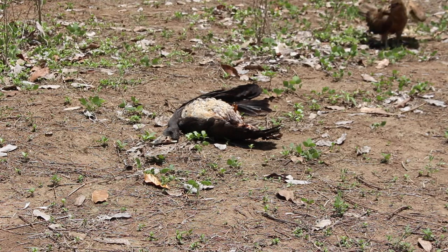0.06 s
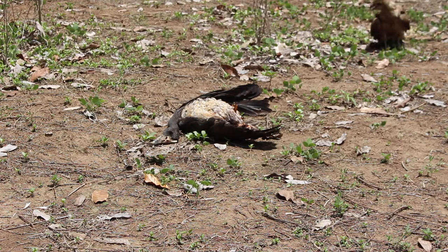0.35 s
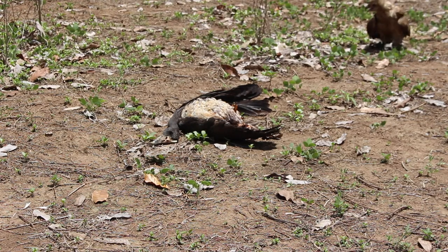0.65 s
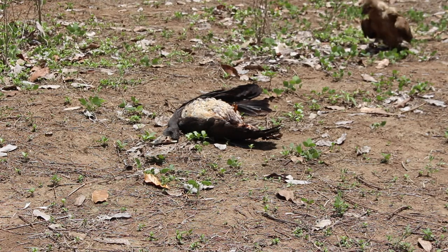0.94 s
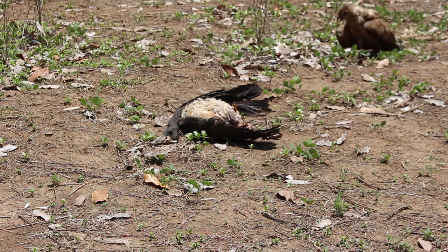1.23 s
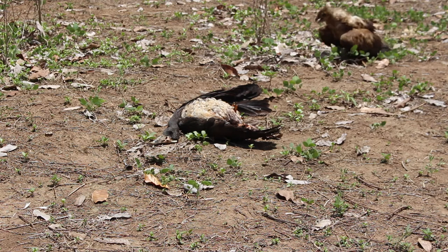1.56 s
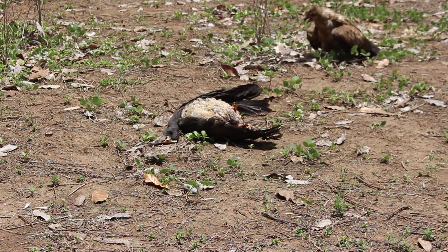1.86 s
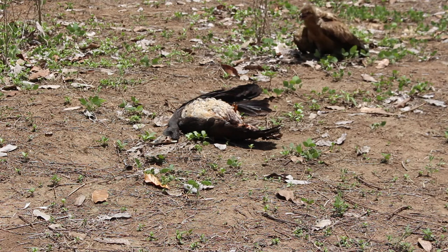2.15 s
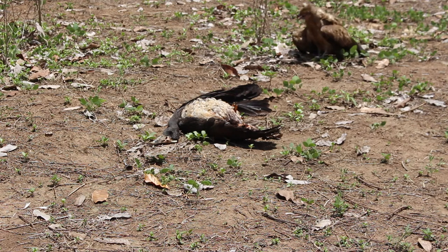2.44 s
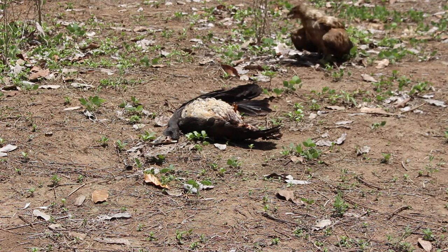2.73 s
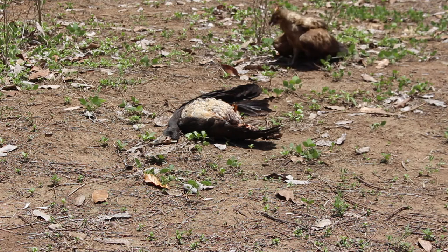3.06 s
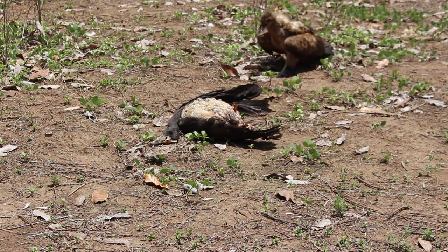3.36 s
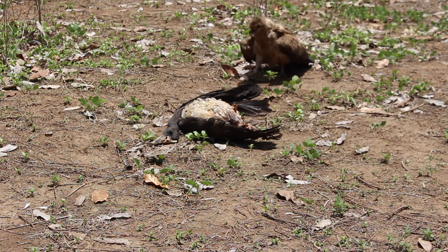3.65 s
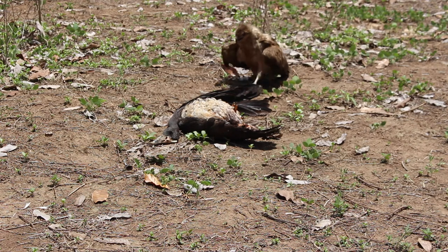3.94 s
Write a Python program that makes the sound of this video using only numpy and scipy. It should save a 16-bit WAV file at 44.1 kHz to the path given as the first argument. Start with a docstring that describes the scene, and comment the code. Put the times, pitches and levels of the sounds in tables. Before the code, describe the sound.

A bird of prey whistles rapidly and a smaller bird answers, with gusty wind.

```python
"""Whistling kite in windy bushland

A whistling kite on the left gives a run of short whistles that arch up and slide down. A smaller bird
answers with five low-high-middle phrases of pure, trilled tones. The trees echo both. Gusts of wind
buffet the microphone, cicadas click so fast that they buzz, and dry leaves tick over a steady hush."""
import sys
import numpy as np
from scipy import signal
from scipy.fft import rfft, irfft, next_fast_len
from scipy.io import wavfile
from scipy.ndimage import map_coordinates

SR = 44100
rng = np.random.default_rng(int(sys.argv[2]) if len(sys.argv) > 2 else 0)


def master_out(mix):
    """Clip the mix to full scale and print it as 16-bit PCM to the path in sys.argv[1]."""
    frames = np.transpose(np.atleast_2d(mix))
    ceiling = np.clip(frames, -1, 1)
    pcm = np.round(ceiling * 32767).astype(np.int16)
    wavfile.write(sys.argv[1], SR, pcm)


N = 176400

# The kite's whistles: (time of the top [s], pitch [Hz], level [dB], boost on the way down [dB],
# richness [dB], glide [share of pitch per s], echo boost [dB])
KITE_WHISTLES = [(0.202, 1540, -42, 5, -17, 6, 2), (0.408, 1753, -37.5, 13, 3, 5.9, 2.5),
                 (.613, 1799, -30, -5, -2, 8.8, 0), (.793, 1837, -27.5, -3, -6, 9.9, -1.5),
                 (0.956, 1868, -25.5, -1, -4.5, 8.3, -1), (1.107, 1842, -28, -3, -2.5, 10.8, -1),
                 (1.236, 1839, -29.5, -10, -3, 8.6, -2.5), (1.372, 1745, -41.5, 16, 11, 8.5, 5.5),
                 (1.497, 1770, -40, 16, 9, 9.1, 6), (1.616, 1740, -45, 16, 14, 9, 8),
                 (1.738, 1678, -45.5, 19.5, 15, 8.1, 11.5), (1.858, 1708, -47, 28, 16, 7, 13),
                 (1.992, 1719, -42, 8, 8, 6.5, 6.5), (2.122, 1799, -41.5, 11, -2, 9, 9.5)]
# Harmonics 1 to 5 of a whistle: (level [dB], share of the richness [ratio])
KITE_HARMONICS = [(-12.5, 0.34), (0, 0), (-15.5, 0.6), (-22.5, 1.05), (-35, .7)]
# The small bird's phrases: (time [s], pitch [Hz], level [dB], time stretch [ratio])
BIRD_PHRASES = [(1.552, 1529, -35, 0.91), (1.811, 1502, -34, 0.92), (2.12, 1483, -36, 0.96),
                (2.44, 1476, -38, 1.02), (2.817, 1472, -40.5, 0.98)]
# The parts of a phrase: (time into it [s], length [s], start pitch [ratio], middle pitch [ratio],
# end pitch [ratio], trill depth [share of pitch], level [dB])
PHRASE_NOTES = [(.001, 0.048, 1.08, 1.0, 1.028, .012, -0.5),
                (0.058, 0.0248, 0.9, 1.025, 1.054, 0.026, -2.5), (0.073, .042, 1.08, 1.125, 1.12, .03, -2),
                (.115, 0.039, 1.075, 1.055, 1.09, 0.017, -2)]
# Buzzes that lead into a phrase: (time [s], length [s], start pitch [Hz], end pitch [Hz], level [dB])
BIRD_BUZZES = [(1.484, 0.071, 1747, 1860, -45), (2.098, 0.039, 1815, 1746, -46)]
# Wind strength: (time [s], left level [dB], right level [dB])
WIND_STRENGTH = [(0.0, -32, -32.5), (0.03, -30, -36.5), (0.05, -40, -46.5), (0.3, -23.5, -31),
                 (0.35, -26.5, -35.5), (0.45, -21.5, -28.5), (0.55, -24.5, -29.5), (0.7, -22.5, -19),
                 (0.8, -26.5, -25), (0.87, -14, -16.5), (1.01, -27, -21), (1.29, -23.5, -20),
                 (1.35, -39.5, -31.5), (1.52, -30.5, -23.5), (1.65, -41.5, -36), (1.67, -28, -23),
                 (1.79, -37.5, -29.5), (1.9, -27, -19.5), (1.95, -36, -30.5), (1.97, -30, -20.5),
                 (2.06, -44.5, -37.5), (2.18, -30.5, -23.5), (2.24, -45.5, -48), (3.35, -52.5, -55),
                 (3.46, -37, -38), (3.61, -48, -54), (3.8, -21, -28), (3.99, -16.5, -21.5)]
# The low rumble of gusts: (frequency [Hz], level [dB])
GUST_SPECTRUM = [(13, -57), (22, -23.5), (64, 3), (140, 2.5), (258, -11.5), (392, -29.5), (539, -33),
                 (700, -53), (910, -79), (1540, -120)]
# Finer swirls of air: (frequency [Hz], level [dB])
SWIRL_SPECTRUM = [(120, -16), (220, 6.5), (320, -3), (450, -13.5), (700, -29.5), (1100, -64), (2000, -100)]
# Single eddies that thump: (time [s], level over the gust [dB], pitch [Hz], width [s])
EDDIES = [(0.506, 12, 210, 0.0045), (0.736, 15, 85, 0.014), (0.833, 6, 238, .005),
          (0.969, 13.5, 243, 0.0028), (1.079, 6.5, 316, 0.0018), (1.115, 8, 166, 0.0041),
          (1.263, 12.5, 267, 0.002), (1.973, 5.5, 280, 0.003), (2.171, 10.5, 153, 0.0098),
          (3.814, 8.5, 162, 0.0074), (3.935, 15, 115, 0.003), (3.972, 10.5, 254, .004)]
# The cicadas swell and fade: (time [s], level [dB])
CICADA_LEVELS = [(0.0, -64), (0.11, -65.5), (0.2, -57), (0.63, -55.5), (0.79, -60.5), (1.05, -55.5),
                 (1.82, -59.5), (1.99, -53.5), (2.06, -59.5), (2.31, -56.5), (2.92, -59.5), (3.04, -53.5),
                 (3.35, -60.5), (3.59, -53), (3.73, -61.5), (4.0, -58)]
# The haze of far cicadas: (frequency [Hz], level [dB])
HAZE_SPECTRUM = [(7500, -70), (8700, -16), (9300, 1), (10200, -1), (10750, 2), (11300, -12.5), (12300, -30),
                 (15000, -50)]
# Ticks of dry leaves: (time [s], level [dB])
LEAF_TICKS = [(.635, -53), (1.56, -53), (1.901, -50), (2.688, -47), (2.852, -47)]
# The noise in each tick: (frequency [Hz], level [dB])
LEAF_SPECTRUM = [(600, -6), (2500, 0), (6000, -7), (15000, -25)]
# The hush of open air: (frequency [Hz], level [dB])
AIR_SPECTRUM = [(15, -47), (25, 4), (91, -11), (129, -29), (164, 4), (260, -1.5), (281, 0.5), (358, 0),
                (389, -3), (495, -2), (597, -4.5), (684, -4.5), (1530, -9.5), (2420, -11), (5280, -13.5),
                (6910, -18), (10300, -22), (12500, -30), (15500, -36)]
# How alike the hush is on both sides: (frequency [Hz], likeness [-1 to 1])
AIR_LIKENESS = [(60, -0.36), (450, -0.41), (950, -0.32), (1900, 0.094), (7500, 0.18), (15000, 0.064)]
# Shaping that favours the high treble of the hush: (frequency [Hz], gain [dB])
AIR_TREBLE = [(7500, -6), (9500, -2), (10800, 0), (12200, -4.5)]


def amp(db):
    """Turn decibels into a gain."""
    return 10 ** (np.asarray(db) / 20)


def unit(x):
    """Scale a sound to an average (rms) level of 1."""
    return x / np.sqrt(np.mean(x ** 2) + 1e-20)


def along(points, hz):
    """Read between (frequency, value) points on a log frequency axis."""
    freqs, values = np.transpose(points)
    return np.interp(np.log(hz + 1), np.log(freqs + 1), values)


def curves(rows):
    """One value per sample for each column after the time."""
    times, *columns = np.transpose(rows)
    return np.array([np.interp(np.arange(N) / SR, times, column) for column in columns])


def wobble(rate, size=N):
    """A smooth curve through `rate` random values a second."""
    return map_coordinates(rng.standard_normal(4096), [np.arange(size) * rate / SR], mode="wrap")


def filtered(x, response):
    """Multiply each frequency in x by response(hz)."""
    size = next_fast_len(N + SR // 2)
    return irfft(rfft(x, size) * response(np.fft.rfftfreq(size, 1 / SR)), size)[..., :N]


def stereo_noise(spectrum, likeness):
    """Noise with a given spectrum; likeness 1 makes both sides the same, -1 opposite."""
    def response(hz):
        angle = np.arccos(np.clip(along(likeness, hz), -1, 1)) / 2
        return amp(along(spectrum, hz)) * [np.cos(angle), np.sin(angle)]
    mid, side = filtered(rng.standard_normal((2, N)), response)
    return unit(np.array([mid + side, mid - side]))


def pan_left(db):
    """Gains that make the left side louder than the right by db."""
    return amp([[db / 2], [-db / 2]])


def add(track, time, sound):
    """Mix a sound in at a time in seconds."""
    part = track[max(round(time * SR), 0):][:len(sound)]
    part += sound[:len(part)]


def fades(t, length, edge_s):
    """Fade in, hold, fade out."""
    return np.sin(np.pi / 2 * np.clip(np.minimum(t, length - t) / edge_s, 0, 1)) ** 2


def kite():
    """Arched whistles, led by the second harmonic. Returns the direct sound and what the trees get."""
    rise_s, fall_s, slide_s, round_top_s = 0.024, 0.039, 0.032, 0.018
    pitch_jitter, flutter_db, slide_loss_db = 0.0022, 0.9, 10.5
    direct, to_trees = np.zeros((2, N))
    t = np.arange(int((rise_s + fall_s) * SR)) / SR
    from_top = t - rise_s
    arch = np.hypot(from_top, round_top_s) - round_top_s
    slide = np.clip(from_top / slide_s, 0, 1) ** 2  # goes from 0 to 1 on the way down
    envelope = fades(t, rise_s + fall_s, edge_s=0.019)
    for time, hz, db, slide_db, richness_db, glide, echo_db in KITE_WHISTLES:
        rasp = 1 + 0.13 * max(richness_db, 0)  # richer notes are raspier
        pitch = hz * (1 - glide * arch + rasp * pitch_jitter * wobble(436, len(t)))
        phase = 2 * np.pi * np.cumsum(pitch) / SR
        boost_db = slide * slide_db
        for number, (harmonic_db, share) in enumerate(KITE_HARMONICS, start=1):
            flutter = rasp * flutter_db * wobble(227, len(t))
            gain = amp(db + harmonic_db + flutter - slide_loss_db * slide)
            tone = np.sqrt(2) * gain * np.sin(number * phase) * envelope
            boost_share = 1 if number == 2 else 0.4
            add(direct, time - rise_s, tone * amp(boost_share * boost_db + richness_db * share))
            add(to_trees, time - rise_s, tone * amp(echo_db + 0.69 * boost_db))
    return direct, to_trees


def bird_note(length, start_hz, middle_hz, end_hz, depth, trill_hz=158.7, jitter=0.0082):
    """A pure tone bends through three pitches while a fast trill shakes its pitch and level."""
    t = np.arange(int(length * SR)) / SR
    bend = np.polyval(np.polyfit([0, 0.5, 1], [start_hz, middle_hz, end_hz], 2), t / length)
    trill = np.sin(2 * np.pi * (trill_hz * t + rng.random() + 0.19 * wobble(87, len(t))))
    pitch = bend * (1 + depth * trill + jitter * wobble(350, len(t)))
    tone = np.sqrt(2) * np.sin(2 * np.pi * np.cumsum(pitch) / SR)
    return tone * (1 - 0.067 * trill) * fades(t, length, edge_s=0.0097)


def small_bird():
    """One short tune, sinking and fading as it repeats. A deeper trill makes the two buzzes."""
    song = np.zeros(N)
    for time, hz, db, stretch in BIRD_PHRASES:
        for offset, length, start, middle, end, depth, note_db in PHRASE_NOTES:
            note = bird_note(length * stretch, hz * start, hz * middle, hz * end, depth)
            add(song, time + offset * stretch, amp(db + note_db) * note)
    for time, length, start_hz, end_hz, db in BIRD_BUZZES:
        buzz = bird_note(length, start_hz, (start_hz + end_hz) / 2, end_hz, depth=0.095)
        add(song, time, amp(db) * buzz)
    return song


def bush_echo(direct, to_trees, lag_s, echo_db):
    """A call from the left, weaker and later on the right, echoes off close scrub and farther trees."""
    scrub_s, trees_s = 0.081, 0.78  # time to die away by 60 dB
    trees_db, direct_right_db, echo_right_db = -21.5, -14.5, -7.5
    t = np.arange(SR) / SR
    decay = amp(-60 * t / scrub_s) + amp(trees_db - 60 * t / trees_s)
    build_up = 1 - np.exp(-t / 0.029)
    tail = unit(rng.standard_normal((2, SR)) * decay * build_up) / np.sqrt(SR)
    echo = signal.fftconvolve(to_trees[None], tail, axes=1)[:, :N]
    delayed = filtered(direct, lambda hz: np.exp(-2j * np.pi * hz * lag_s))
    call = np.array([direct, amp(direct_right_db) * delayed])
    return call + echo * amp([[echo_db], [echo_db + echo_right_db]])


def wind(low_cut_hz=23, gust_db=0.5, lump_db=2.5):
    """Lumpy gusts, finer swirls and single eddies push the microphone's two sides in opposite ways."""
    strength_db, likeness = curves(WIND_STRENGTH), [(100, -0.79)]
    rumble = filtered(stereo_noise(GUST_SPECTRUM, likeness), lambda hz: hz / np.hypot(hz, low_cut_hz))
    gusts = amp(gust_db) * unit(rumble * amp(lump_db * wobble(45)))
    swirls = unit(stereo_noise(SWIRL_SPECTRUM, likeness) * amp(4.9 * wobble(60)))
    swirl_db = -29.5 + 2.43 * (strength_db + 17)  # swirls grow faster than the gust
    eddies, t = np.zeros(N), np.arange(-SR // 25, SR // 25) / SR
    for time, db, hz, width in EDDIES:
        thump = np.exp(-(t / width) ** 2) * np.cos(2 * np.pi * (hz * t + rng.random()))
        add(eddies, time + t[0], amp(db) * thump)
    return amp(strength_db) * (gusts + eddies * [[1], [-1]]) + amp(swirl_db) * swirls


def cicadas(beat_hz=203.8, ring_hz=10100, click_s=0.00032, click_db=-4, haze_db=-2.5):
    """A near cicada clicks in threes with a beat's rest, over the haze of far ones."""
    beats = np.cumsum(beat_hz * (1 + 0.004 * wobble(1.3))) / SR
    beat_number = beats.astype(int)
    from_click = (beats % 1 - 0.5) / beat_hz
    size, slip = rng.standard_normal((2, 2048))[:, beat_number]  # each click's own level and phase
    sounding = beat_number % 4 < 3
    pitch = ring_hz + 180 * wobble(2.92)
    ring = np.sin(2 * np.pi * pitch * from_click + 0.33 * slip)
    envelope = np.exp(-(from_click / click_s) ** 2 / 2)
    clicks = unit(sounding * amp(2 * size) * envelope * ring)
    haze = stereo_noise(HAZE_SPECTRUM, likeness=[(10000, 0.47)])
    return amp(curves(CICADA_LEVELS)) * pan_left(db=4.5) * (amp(click_db) * clicks + amp(haze_db) * haze)


def leaves(rise_s=0.0027, decay_s=0.036):
    """Dry leaves tick: faint bursts of noise that start fast and die away."""
    envelope, t = np.zeros(N), np.arange(SR // 10) / SR
    for time, db in LEAF_TICKS:
        add(envelope, time, amp(db) * np.exp(-t / decay_s) * (1 - np.exp(-t / rise_s)))
    return envelope * stereo_noise(LEAF_SPECTRUM, likeness=[(3000, 1.0)])


def air(level_db=-47.5):
    """The steady hush of open country."""
    noise = stereo_noise(AIR_SPECTRUM, AIR_LIKENESS)
    hush = unit(filtered(noise, lambda hz: amp(along(AIR_TREBLE, hz))))
    return amp(level_db + 0.2 * wobble(4.2)) * pan_left(db=3) * hush


def scene():
    """Mix both birds and their echoes with the insects, wind, leaves and air."""
    song = small_bird()
    whistles, to_trees = kite()
    birds = bush_echo(whistles, to_trees, lag_s=6e-5, echo_db=-7.5)
    birds += bush_echo(song, song, lag_s=8.6e-5, echo_db=-8.5)
    return birds + cicadas() + wind() + leaves() + air()


def record(dry):
    """Cut away everything above 15700 Hz."""
    return filtered(dry, lambda hz: hz < 15700)


dry = scene()
out = record(dry)
master_out(out)
```